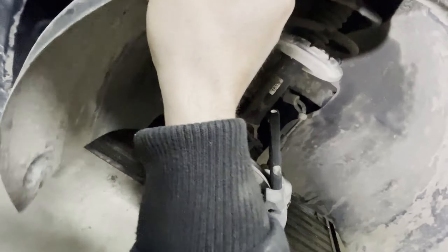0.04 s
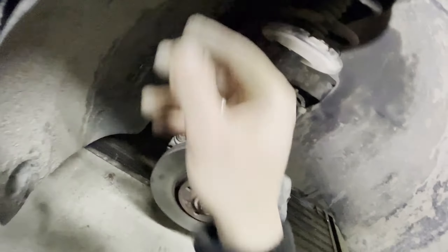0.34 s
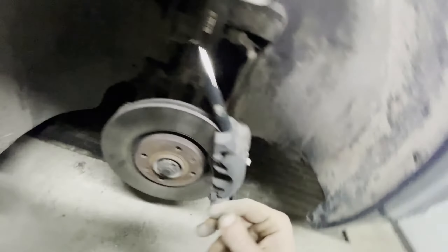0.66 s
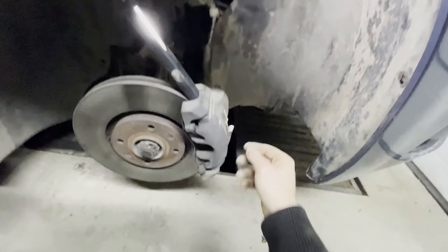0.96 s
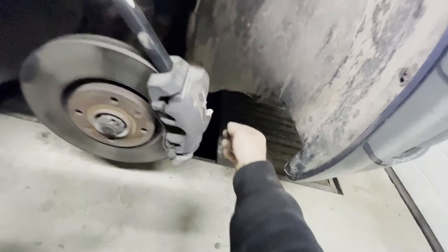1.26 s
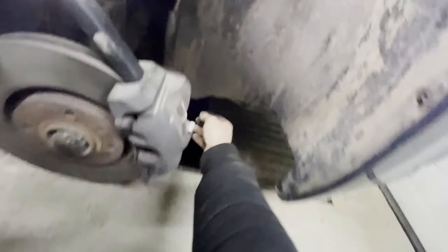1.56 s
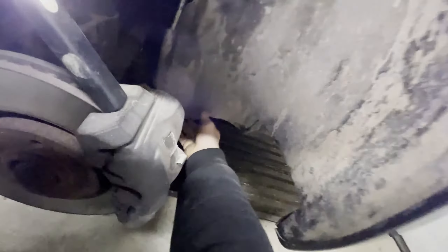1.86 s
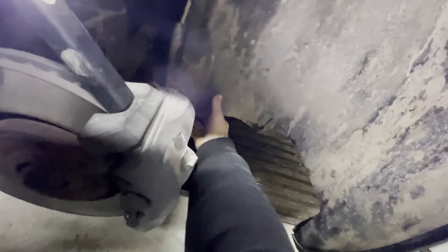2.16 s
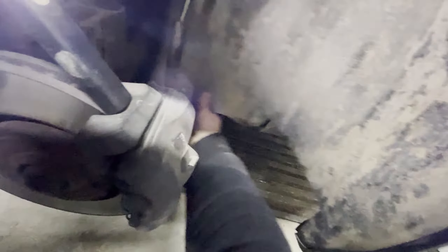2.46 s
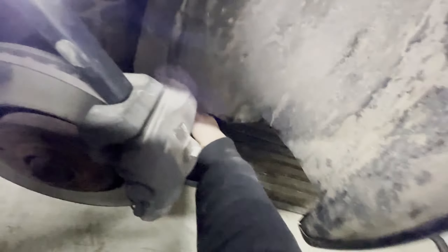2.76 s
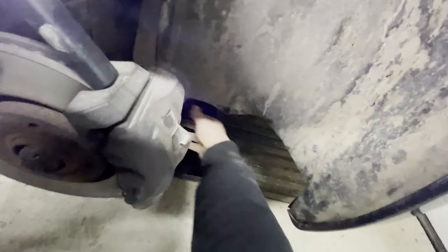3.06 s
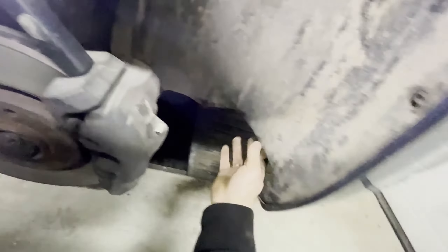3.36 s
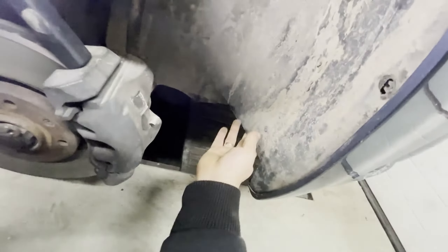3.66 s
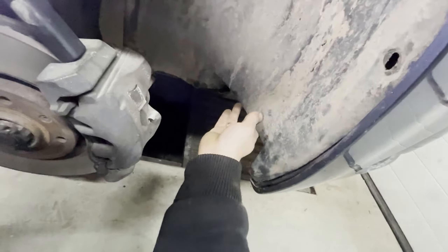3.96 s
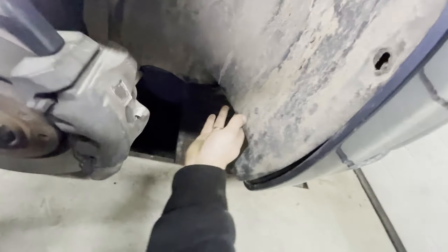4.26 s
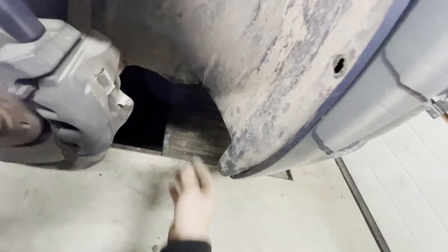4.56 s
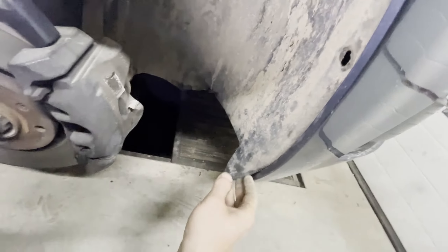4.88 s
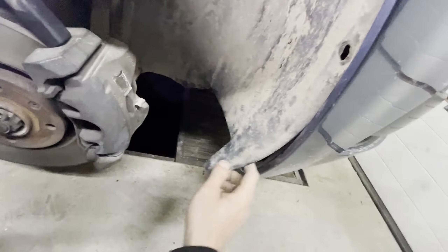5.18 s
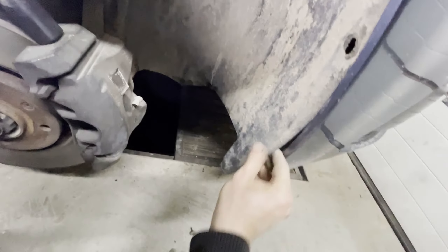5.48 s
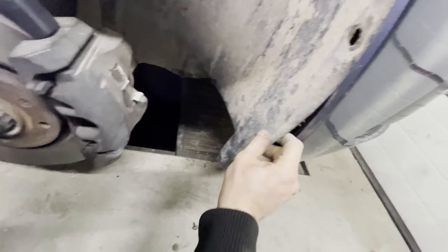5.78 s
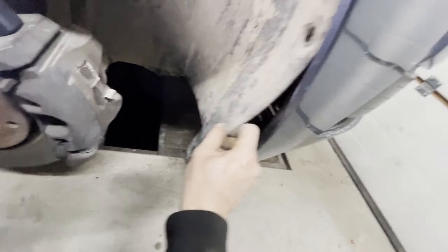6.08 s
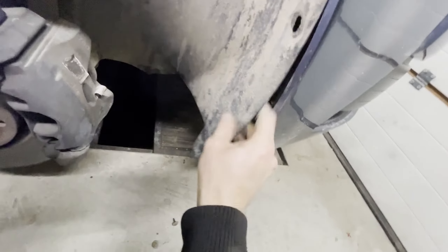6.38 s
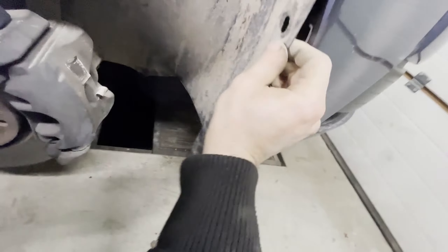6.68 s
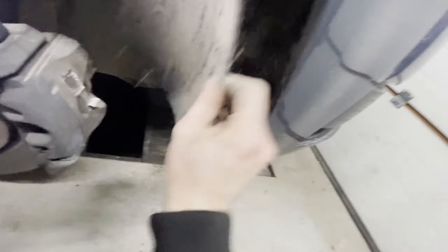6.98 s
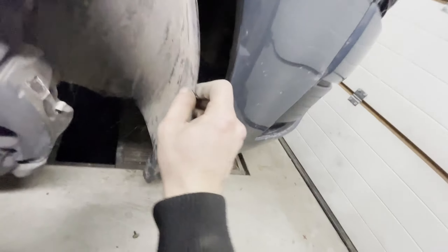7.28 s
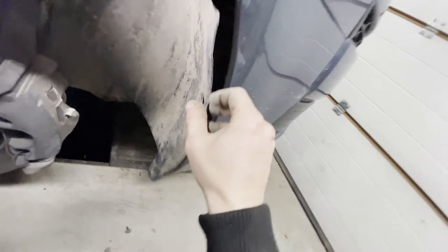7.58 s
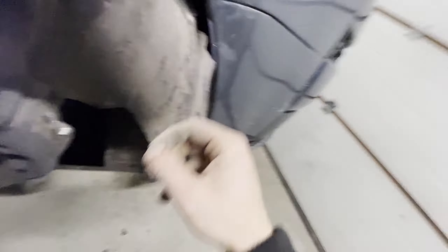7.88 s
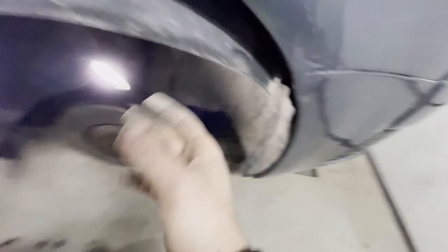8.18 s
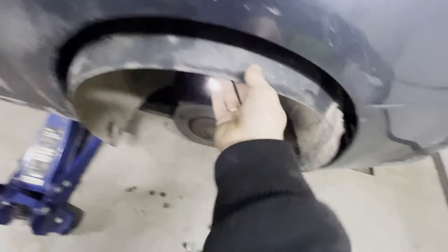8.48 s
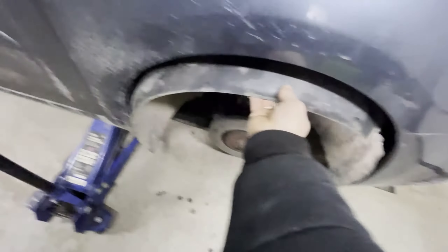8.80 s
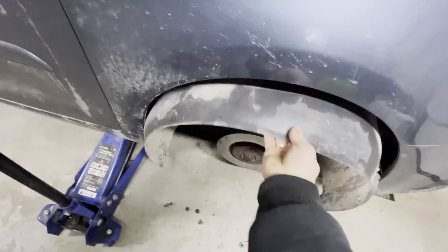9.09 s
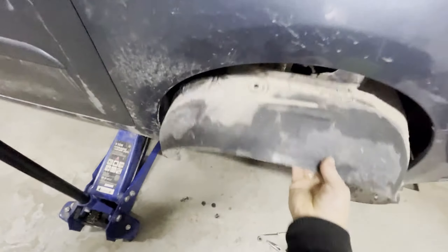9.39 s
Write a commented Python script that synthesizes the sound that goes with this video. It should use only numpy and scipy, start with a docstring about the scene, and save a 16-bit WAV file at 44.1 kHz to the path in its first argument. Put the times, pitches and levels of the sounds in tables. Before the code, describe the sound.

A plastic liner is worked out of a car's wheel well by hand, heard close in a quiet garage. The first two seconds hold only faint rubbing and a few light taps. From about 2.3 to 3.2 seconds the edge scrapes hard and lets go in sharp, hollow knocks, the sheet drumming as it flexes. Another scrape and loud snap come at 4 seconds, followed by quick smaller knocks and a rasp around 4.5. Lighter clicks and rubbing continue from 5 to 6 seconds. A cluster of snaps lands at 6.2, then scraping and sleeve rustle lead to the strongest knocks, from 6.9 to 7.3. After a knock at 7.5 things quieten. Around 9 seconds the loose liner scrapes and knocks again, ringing lower and longer, with a last light scrape at 9.4. Fingers rub and dried dirt ticks faintly between the bursts.

```python
"""Working a wheel-well liner free

A plastic liner is worked out of a car's wheel well by hand, in a quiet garage. Its edge scrapes along
the wing, catches and snaps free, and the sheet drums as it flexes. Fingers rub, dried dirt ticks and
a sleeve rustles close by. Near the end the liner hangs loose and rings lower and longer."""
import sys
import numpy as np
from scipy import signal
from scipy.fft import rfft, irfft, next_fast_len
from scipy.io import wavfile

SR = 44100
rng = np.random.default_rng(int(sys.argv[2]) if len(sys.argv) > 2 else 0)


def transcribe(u):
    """Save the signal u as a 16-bit wav file named by the first command-line argument.

    u: samples, shape (n,) or (channels, n), limited to [-1, 1]; the rate is SR.
    q: integer samples, one column per channel.
    """
    v = np.clip(np.atleast_2d(u).T, -1, 1)
    q = np.round(v * 32767).astype(np.int16)
    wavfile.write(sys.argv[1], SR, q)


N = 416304
TIME = np.arange(N) / SR
RING = SR // 2  # samples allowed for a tail
TOP_HZ = 15700

# The edge catching and letting go. Each row: start in seconds, knock level in dB,
# corner of the contact in Hz, snap level in dB.
KNOCKS = [(0.841, -4, 2300, 5), (1.09, -5, 1000, -14), (1.947, -30, 700, 5.5), (2.17, -1, 500, 8.5),
          (2.324, 23, 920, 26), (2.466, 3, 1000, -6), (2.618, 28, 760, 20.5), (2.654, 29.5, 640, 13.5),
          (2.711, 26, 565, 8), (2.904, 33.5, 2020, 33), (3.125, 28, 570, 26), (3.152, 25, 2720, 26.5),
          (3.529, 13.5, 1010, -2), (3.725, 12, 447, -4), (3.879, 4.5, 780, -15), (4.005, 33.5, 2070, 32.5),
          (4.036, 30.5, 740, -2), (4.129, 21.5, 1500, 10.5), (4.156, 18.5, 1390, 10),
          (4.186, 15.5, 2160, 13), (4.225, 11, 560, -12), (4.318, 3.5, 894, -18), (4.595, 4.5, 700, 7),
          (4.678, -1.5, 710, 3), (4.879, -5, 875, -4), (4.898, 0, 1000, -22), (4.968, 18.5, 4000, 22.5),
          (5.17, 22.5, 675, 8), (5.241, 12.5, 700, 2.5), (5.355, 14.5, 1240, 11), (5.739, 10, 1110, -15),
          (5.862, 15, 1300, 7.5), (6.056, 15, 860, -11), (6.199, 28, 1980, 24), (6.225, 30, 3720, 13.5),
          (6.231, 32.5, 1010, 25.5), (6.449, 8.5, 412, -1), (6.798, 9, 1900, 8), (6.901, 34, 534, 3),
          (6.969, 38, 900, 37), (7.05, 32.5, 850, 23.5), (7.145, 34.5, 375, 22), (7.198, 4, 790, -11.5),
          (7.225, 25, 1160, 11.5), (7.287, 21.5, 770, -10), (7.517, 18, 630, 11), (7.811, -1, 1580, 0.5),
          (7.968, -39, 500, 7.5), (8.007, -1, 1230, -13), (8.598, 10, 450, -20), (8.661, 0, 915, -14),
          (8.973, 28, 600, 5), (9.019, 25.5, 350, -13), (9.396, 7, 1230, 6)]
# The hand's work between knocks. Each row: time in seconds, flexing level in dB, rubbing level in dB.
HANDLING = [(0, -42, -47), (.15, -52, -54), (.35, -97, -68.5), (1.3, -73, -69.5), (1.85, -58, -56),
            (2.3, -43, -69), (2.55, -30, -40), (3.199, -29.5, -40), (3.45, -49, -74), (3.72, -36.5, -56),
            (4.5, -41.5, -40.5), (4.82, -45, -70), (5.28, -40, -45), (5.53, -48.5, -51), (5.78, -25, -46),
            (6.03, -39.5, -60), (6.3, -32, -47), (6.6, -44.5, -51.5), (7.451, -34, -39.5), (7.68, -49, -58),
            (8.452, -48.5, -53.5), (9.44, -45, -41)]
# A light tap leaves the sheet still, a firm knock heaves all of it. Each row: knock in dB, thump in dB.
HEAVE = [(-9.5, -36), (0.5, 17), (24.5, 26.5), (41, 41)]
# How freely the bowed sheet drums. Each row: time in seconds, boost of the drum note in dB.
DRUMMING = [(2.4, 10.5), (3.55, 6), (4.42, 18.5), (4.6, -2), (5.2, 6.5), (6.9, 9.5), (7.15, 18.5),
            (7.5, 10.5), (8.6, 5)]
# Scatter inside the wheel well. Each row: frequency in Hz, seconds to fade by 60 dB.
WELL_DECAY = [(200, 0.042), (8000, 0.043)]


def undb(db):
    """Decibels to gain."""
    return 10 ** (np.asarray(db) / 20)


def along(points, x):
    """A two-column table read along straight lines."""
    return np.interp(x, *np.transpose(points))


def read(points, hz):
    """A table of frequencies and values, read on a log-frequency axis."""
    f, value = np.transpose(points)
    return np.interp(np.log(hz + 1e-3), np.log(f), value)


def unit(x):
    """Scale to rms 1."""
    return x / np.sqrt(np.mean(x ** 2))


def bins(size):
    """Frequencies of a real spectrum."""
    return np.arange(size // 2 + 1) * SR / size


def colour(x, points):
    """Minimum-phase EQ through points of frequency in Hz and gain in dB."""
    size = x.shape[-1]
    cepstrum = irfft(np.log(undb(read(points, bins(size)))), size)
    cepstrum[1:size // 2] *= 2
    cepstrum[size // 2 + 1:] = 0
    return irfft(rfft(x) * np.exp(rfft(cepstrum)), size)


def cut(x, hz, kind, order):
    """Butterworth low-pass or high-pass."""
    return signal.sosfilt(signal.butter(order, min(hz, SR / 2 - 100), kind, fs=SR, output="sos"), x)


def add(track, start, x):
    """Mix x into the track from a start in seconds."""
    i = max(0, int(start * SR))
    track[..., i:i + x.shape[-1]] += x[..., :max(0, N - i)]


def spread(mid, side, side_db=0):
    """Two unrelated signals to left and right: alike in the bass, apart above."""
    # Stereo width. Each row: frequency in Hz, side gain in dB.
    width = [(60, -23), (150, -20), (300, -16), (430, -10), (600, 0), (1200, -3.5), (3000, .5), (7000, 0),
             (11000, -5)]
    return mid + undb(side_db) * colour(side, width) * np.array([[1], [-1]])


def grit(size, slip_hz, rough_db):
    """Stick-slip: noise that comes in uneven bunches."""
    bunch = np.interp(np.arange(size) * slip_hz / SR, np.arange(size), rng.standard_normal(size))
    return unit(rng.standard_normal(size) * undb(rough_db * bunch))


def reflections(decay, build_s):
    """A stereo cloud of echoes, equal energy at every frequency, each octave dying at its own rate."""
    size = next_fast_len(int(SR * max(t60 for _, t60 in decay)) + 512, real=True)
    size += size % 2
    t, hz = np.arange(size) / SR, bins(size)
    centres = 2. ** np.arange(5, 15)
    noise = rfft(rng.standard_normal((2, SR))[:, :size], size)
    cloud = 0
    for centre, pick in zip(centres, np.eye(len(centres))):
        band = read(np.column_stack([centres, pick]), hz)
        fade = (1 - np.exp(-t / build_s)) * np.exp(-np.log(1000) * t / read(decay, centre))
        echoes = irfft(noise * band, size) * fade
        energy = np.sum(echoes ** 2, axis=1, keepdims=True) + 1e-18
        cloud = cloud + echoes * np.sqrt(np.mean(band ** 2) / energy)
    return np.pad(spread(*cloud), ((0, 0), (0, RING)))[:, :RING]


def contact(push, spot_db, corner_hz, heave_db, crack_db, lowest_hz=220, spot_q=1.596):
    """Three pushes: the whole sheet heaves, the spot springs back (softer is lower), the edge cracks."""
    heave = cut(push[0], 170, "low", order=3)
    w = 2 * SR * np.tan(np.pi * corner_hz / SR)
    spring = signal.bilinear([w * w], [1, w / spot_q, w * w], SR)
    spot = signal.lfilter(*spring, cut(push[1], lowest_hz, "high", order=3))
    crack = cut(push[2], 3500, "high", order=2)
    return undb(heave_db) * heave + undb(spot_db) * spot + undb(crack_db) * crack


def sheet(force, start, echo_db, direct_db=-3, well_db=-7, loose_from_s=8.3):
    """The liner's answer to a force at one spot: a first bending wave, echoes and resonances."""
    # Bending waves thrown back by the edges. Each row: frequency in Hz, seconds to fade by 60 dB.
    edge_decay = [(60, 0.24), (160, 0.2), (400, 0.084), (1100, 0.12), (3000, 0.067), (9000, 0.068)]
    # Resonances of the liner wedged in the well, then hanging loose; the drum note comes first.
    # Each row: frequency in Hz, width in Hz, level in dB.
    wedged_modes = [(290.8, 29, -1.5), (79.2, 12, 10), (106.3, 26, 1), (158, 9.5, 2.5), (405, 23, 2),
                    (986, 130, -13), (2780, 320, -7.5), (2980, 390, -25), (5370, 190, -4)]
    loose_modes = [(191, 14.6, 5.5), (59.4, 10, -15), (267, 15, 6), (326.5, 13, 5), (553, 2.5, -2),
                   (817, 2.9, 7)]
    waves = undb(echo_db) * reflections(edge_decay, build_s=0.0017)
    waves += undb(well_db) * reflections(WELL_DECAY, build_s=0.00069)
    waves[:, 0] += undb(direct_db)
    length = len(force) + RING
    size = next_fast_len(length + 4096, real=True)
    hz = bins(size)
    # Wave speed grows as the root of frequency: treble arrives first. Each spot has its own distance.
    travel = 0.013 * rng.uniform(0.3466, 1.3)
    cycles = travel * (2 * np.sqrt(100 * hz) - hz * np.sqrt(100 / TOP_HZ))
    dispersion = np.exp(-2j * np.pi * cycles)
    (drum_hz, drum_width, drum_db), *others = wedged_modes if start < loose_from_s else loose_modes
    modes = [(drum_hz, drum_width, drum_db + along(DRUMMING, start)), *others]
    body = 1 + sum(undb(db) / (1 + 2j * (hz - f) / width) for f, width, db in modes)
    return irfft(rfft(force, size) * rfft(waves, size) * body * dispersion, size)[:, :length]


def air(level_db=-63.5):
    """The quiet, steady air of the garage."""
    # Room tone. Each row: frequency in Hz, level in dB.
    tone = [(15, -28.5), (25, -11.5), (67, 2), (207, -10.5), (450, -9.5), (558, -16), (1350, -21),
            (6540, -30), (9020, -28), (10600, -56.5), (15000, -69.5)]
    mid, side = (unit(colour(rng.standard_normal(N), tone)) for _ in range(2))
    return undb(level_db) * spread(mid, side, side_db=5)


def scrapes(fullness=0.45, rasp_hz=1250, bite_db_per_octave=35.5):
    """The gritty edge is dragged over the wing; each stroke swells and eases."""
    # Each row: start, rise and fall in seconds, rasp level in dB, bite (edge hiss over the rasp) in dB.
    strokes = [(0, 0.13, 0.041, -33.5, 1), (1.991, 0.0088, 0.38, -34, -24), (2.149, 0.028, 0.056, -27, 0.5),
               (2.367, 0.023, 0.021, -14, -2.5), (2.526, 0.0092, 0.09, -3.5, -1),
               (2.569, 0.018, 0.029, -3, -2), (2.807, 0.033, 0.13, -21.5, -1.5),
               (3.108, 0.003, 0.0098, -6, 5.5), (3.124, .008, 0.019, -5, -8),
               (3.533, 0.0054, 0.02, -17.5, 7.5), (3.686, 0.02, 0.012, -17, 4),
               (3.881, 0.077, 0.068, -16.5, -3.5), (3.955, 0.045, 0.053, -5.5, -2.5),
               (4.414, 0.017, 0.031, -8.5, -7), (4.471, 0.038, 0.038, -4, -6),
               (5.372, 0.074, 0.018, -26.5, 5.5), (5.548, 0.045, 0.0084, -27.5, 10.5),
               (5.677, 0.0043, 0.059, -21.5, 2), (5.84, 0.0095, 0.035, -17.5, -10),
               (6.418, 0.019, .26, -24, 5), (6.63, 0.1, 0.032, -17, 5.5), (6.861, 0.033, 0.013, -21, -3),
               (7.13, 0.018, 0.097, -14.5, -3), (7.298, 0.075, 0.047, -16, -8),
               (7.479, 0.014, 0.063, -16, -13), (8.689, 0.051, 0.042, -26.5, 6),
               (8.921, 0.089, 0.011, -21, -10), (8.975, 0.018, .19, -21, -3.5),
               (9.392, 0.049, 0.027, -20, 1)]
    out = np.zeros((2, N))
    for start, rise, fall, rasp_db, bite_db in strokes:
        t = np.arange(min(int((rise + fall) * SR), RING)) / SR
        pressure = np.interp(t, [0, rise, rise + fall], [0, 1, 0]) ** fullness
        rough_db = np.interp(rasp_db, [-20, -6], [2.5, 6])  # light strokes glide, hard ones stick
        push = [pressure * grit(RING, slip_hz=408.6, rough_db=rough_db)[:len(t)] for _ in range(3)]
        corner_hz = rasp_hz * 2 ** (bite_db / bite_db_per_octave)  # more bite rasps higher
        bend_db = 0.5 + 0.8 * rasp_db  # harder strokes bend the sheet more
        force = contact(push, rasp_db, corner_hz, bend_db, rasp_db + bite_db)
        add(out, start, sheet(force, start, echo_db=-5))
    return out


def friction(tone, slip_hz, rough_db):
    """Continuous light stick-slip with a given tone, in stereo."""
    mid, side = (unit(colour(grit(N, slip_hz, rough_db), tone)) for _ in range(2))
    return spread(mid, side, side_db=-6.5)


def handling(settle_s=0.061, creep_ceiling_db=-71.5):
    """The sheet wobbles, fingers rub it, the sleeve swells with each reach; knocks stir all three."""
    # The tones of flexing plastic, fingers and cloth. Each row: frequency in Hz, level in dB.
    flex_tone = [(22, -28), (45, 2), (75, 6.5), (160, -2.5), (230, -7.5), (500, -51), (4000, -100)]
    rub_tone = [(120, -20), (290, 7), (430, -2), (700, 1.5), (1400, -13), (2800, -17.5), (4500, -34),
                (15000, -53.5)]
    sleeve_tone = [(100, -20), (800, 4.5), (2500, 1), (4200, -4), (6000, 0.5), (9000, 2.5), (10700, 7.5),
                   (12500, -33), (15500, -36.5)]
    # The sleeve slides as the arm reaches. Each row: middle and length in seconds, level in dB.
    reaches = [(0.1, 0.19, -56), (0.717, 0.82, -66.5), (1.78, 0.83, -66.5), (2.8, 1, -65),
               (4.278, 1, -68.5), (5.6, 0.94, -70), (6.62, 0.45, -45), (7.25, 1, -57.5), (8.787, .4, -63),
               (9.306, 0.81, -74.5)]
    times, flex_db, rub_db = np.transpose(HANDLING)
    flex = undb(np.interp(TIME, times, flex_db))
    rub = undb(np.interp(TIME, times, rub_db))
    slide = np.minimum(undb(1) * flex, undb(creep_ceiling_db))  # the sleeve creeps with the flexing
    for middle, length, db in reaches:
        slide += undb(db) * np.cos(np.pi * np.clip((TIME - middle) / length, -.5, .5)) ** 2
    recoil = np.zeros(N)  # as strong as each knock's heave
    for start, knock_db, *_ in KNOCKS:
        add(recoil, start, undb(along(HEAVE, knock_db)) * np.exp(-TIME[:RING] / settle_s))
    wobble = undb(-2) * flex + undb(-62) * recoil
    fingers = undb(-3.5) * rub + undb(-76.5) * recoil
    sleeve = undb(6.5) * slide + undb(-93) * recoil
    return (wobble * friction(flex_tone, slip_hz=30.64, rough_db=3.5)
            + fingers * friction(rub_tone, slip_hz=91.2, rough_db=3.5)
            + sleeve * friction(sleeve_tone, slip_hz=61.4, rough_db=1.5))


def dirt(count=130, level_db=-26, range_db=14, loosens_db=-59):
    """Dried dirt ticks faintly at random moments as the liner bends, hardly at all while it rests."""
    # The tone of a tick. Each row: frequency in Hz, level in dB.
    tone = [(400, -34), (1200, 2.5), (2500, 6.5), (4500, -2.5), (10500, -1), (13000, -28), (16000, -49)]
    when, softness = rng.random((count, 2)).T
    times, flex_db, _ = np.transpose(HANDLING)
    rest_db = np.minimum(np.interp(when * N / SR, times, flex_db) - loosens_db, 0)
    ticks = np.zeros(N)
    ticks[(when * (N - 1)).astype(int)] = undb(level_db - range_db * softness + rest_db)
    well = reflections(WELL_DECAY, build_s=0.0015)
    return signal.fftconvolve(colour(ticks, tone)[None], well, axes=1)[:, :N]


def knocks(chatter_s=0.004):
    """The liner catches and lets go with a jolt; its edge chatters for a few milliseconds."""
    # A light tap moves only a small spot, with no low notes. Each row: knock in dB, low cut in Hz.
    low_cut = [(-5, 630), (1, 257), (32, 272)]
    out = np.zeros((2, N))
    t = np.arange(SR // 20) / SR
    jolt = 1. * (t == 0)
    for start, knock_db, corner_hz, snap_db in KNOCKS:
        chatter = grit(len(t), slip_hz=1200, rough_db=8) * np.exp(-t / chatter_s)
        chatter /= np.linalg.norm(chatter)
        spot_push = .85 * jolt + .5 * chatter
        edge_push = undb(-6) * jolt + undb(-3) * chatter
        force = contact([jolt, spot_push, edge_push], knock_db, corner_hz,
                        along(HEAVE, knock_db), snap_db, lowest_hz=along(low_cut, knock_db))
        add(out, start, sheet(force, start, echo_db=-6.5))
    return out


def scene(room_db=-15):
    """Liner and handling in the wheel well, with the garage answering the liner."""
    # How the sheet radiates. Each row: frequency in Hz, gain in dB.
    radiation = [(25, -31.5), (60, -9.5), (120, -1.5), (220, -2.5), (450, -3.5), (1000, -12), (2500, -15.5),
                 (4000, -24), (10700, -21), (13000, -40.5), (16000, -81)]
    # Garage reverb. Each row: frequency in Hz, seconds to fade by 60 dB.
    garage_decay = [(60, 1), (160, 0.72), (420, 0.37), (1100, 0.32), (3000, 0.27), (9000, 0.16)]
    # The wheel well tips the mids to the left. Each row: frequency in Hz, left minus right in dB.
    balance = [(100, 0), (300, .3), (420, 2), (600, 8), (850, 4), (1400, .7), (2600, -2.5), (6000, 0)]
    liner = colour(knocks() + scrapes(), radiation)
    room = signal.fftconvolve(liner, reflections(garage_decay, build_s=.005), axes=1)[:, :N]
    lean = undb(read(balance, bins(N)) * np.array([[1], [-1]]) / 2)
    direct = irfft(rfft(liner) * lean, N)
    return direct + undb(room_db) * room + handling() + air() + dirt()


def record(dry, ceiling=0.98):
    """The phone rounds the loudest peaks and cuts the top."""
    rounded = ceiling * np.tanh(dry / ceiling)
    return signal.sosfilt(signal.ellip(8, .2, 70, TOP_HZ, fs=SR, output="sos"), rounded)


dry = scene()
out = record(dry)
transcribe(out)
```